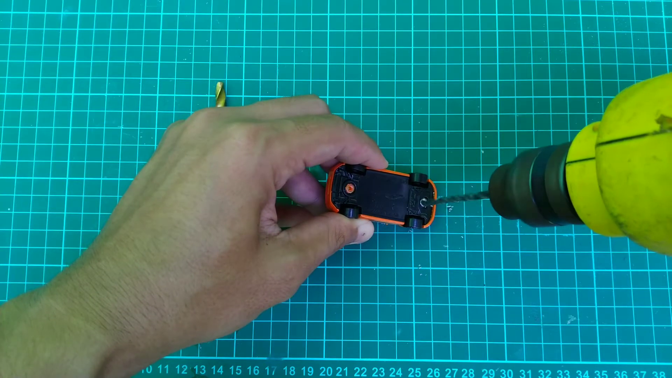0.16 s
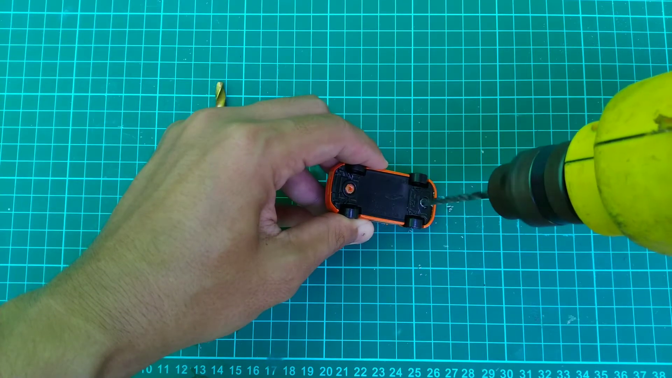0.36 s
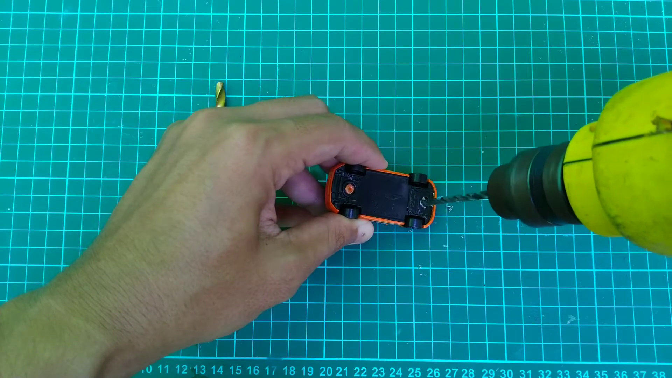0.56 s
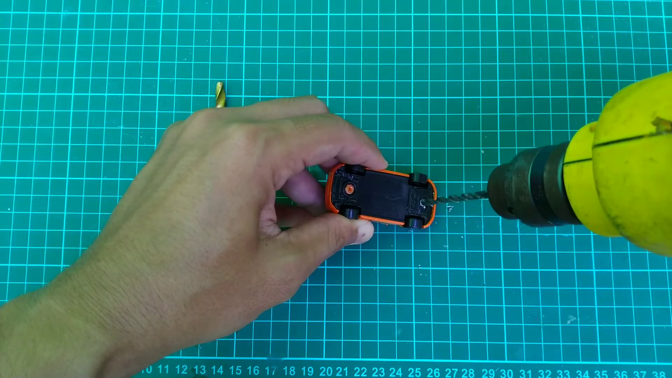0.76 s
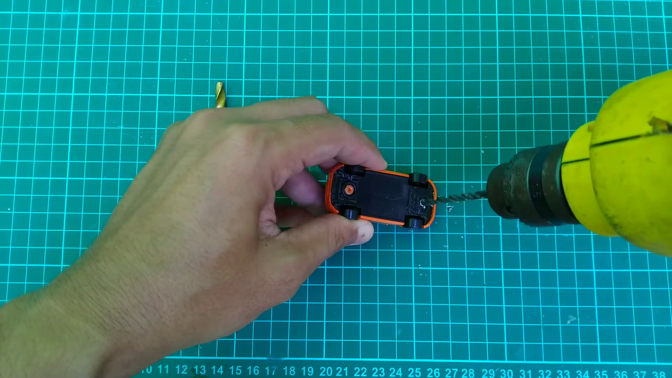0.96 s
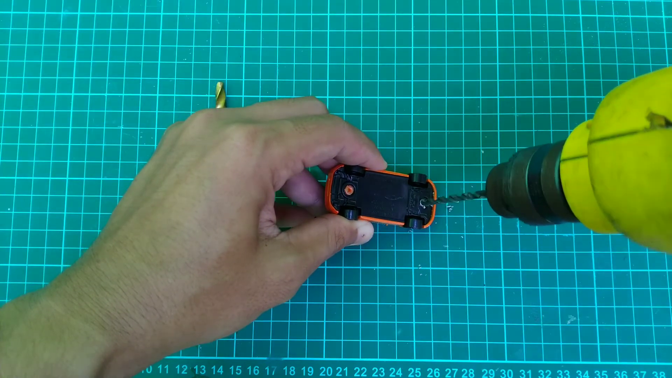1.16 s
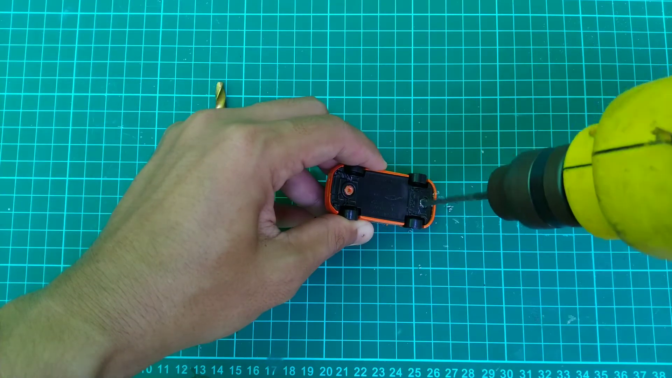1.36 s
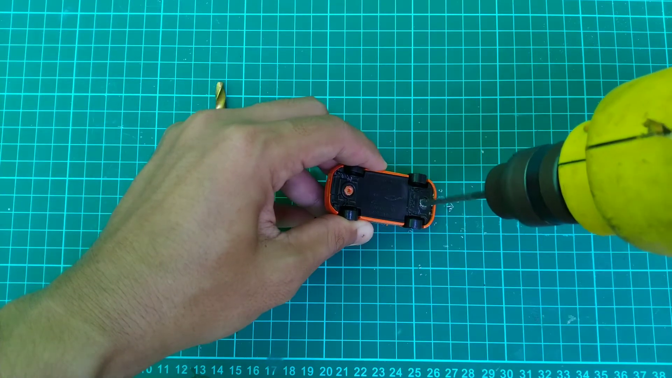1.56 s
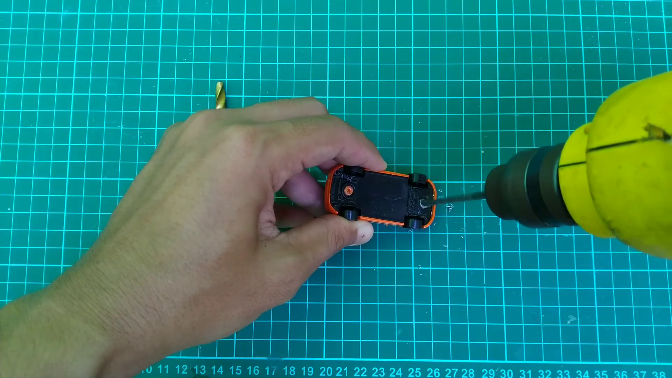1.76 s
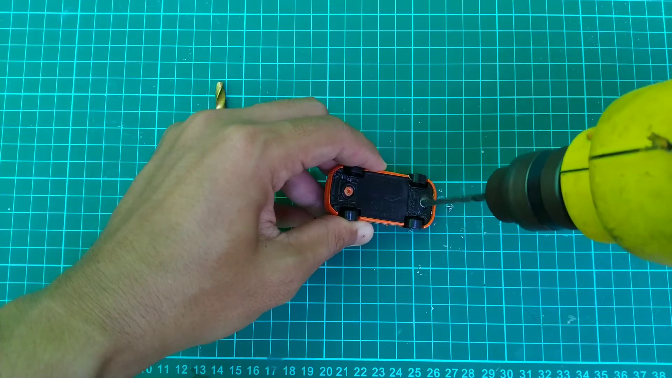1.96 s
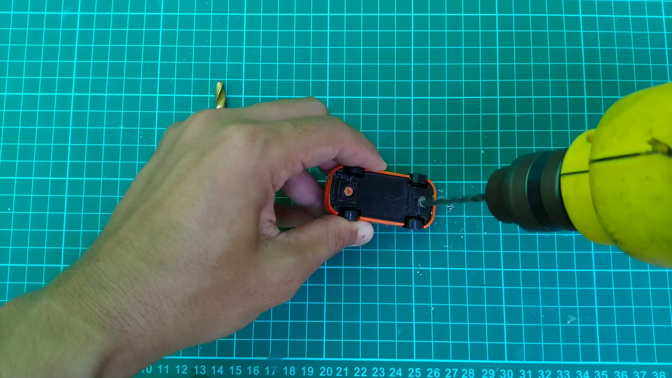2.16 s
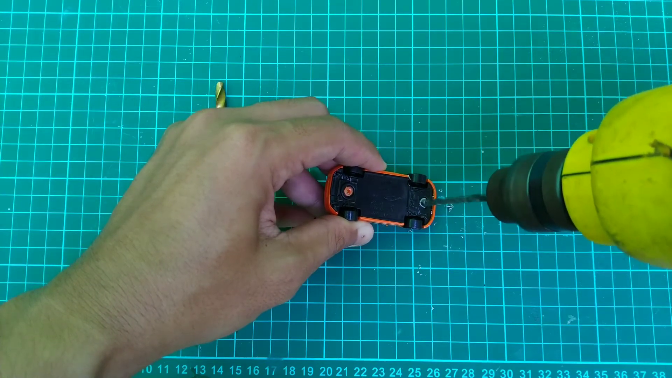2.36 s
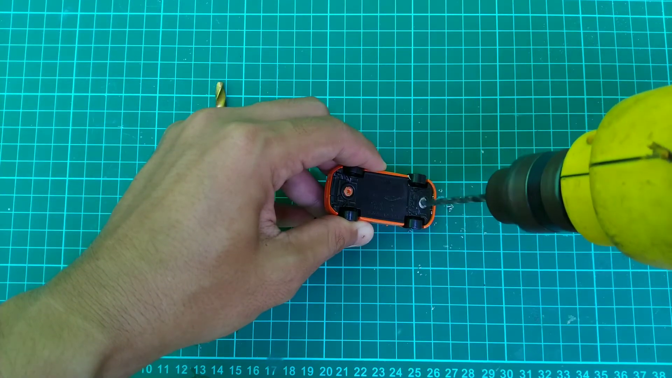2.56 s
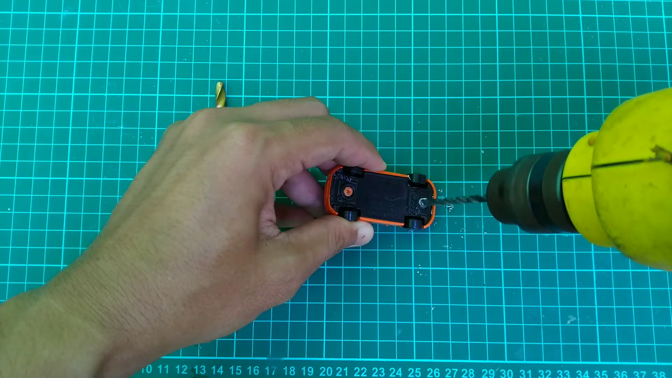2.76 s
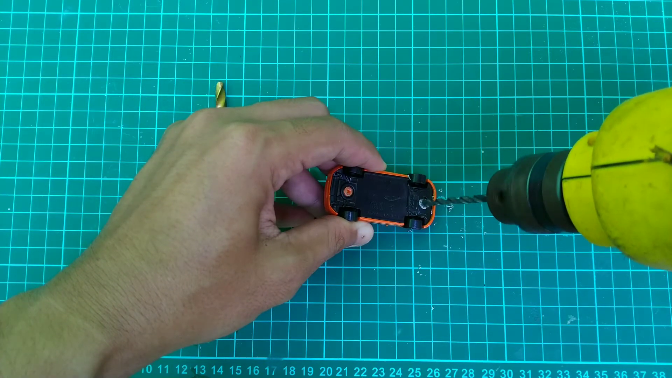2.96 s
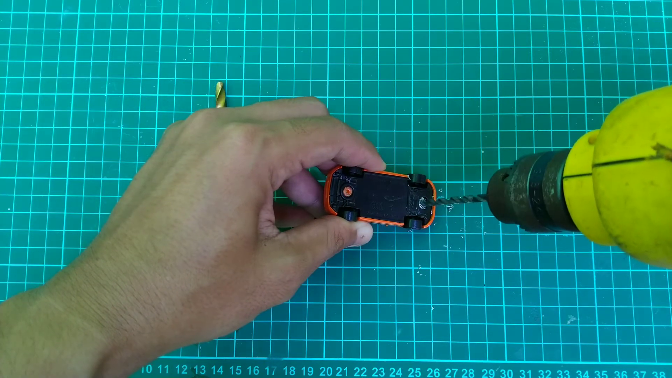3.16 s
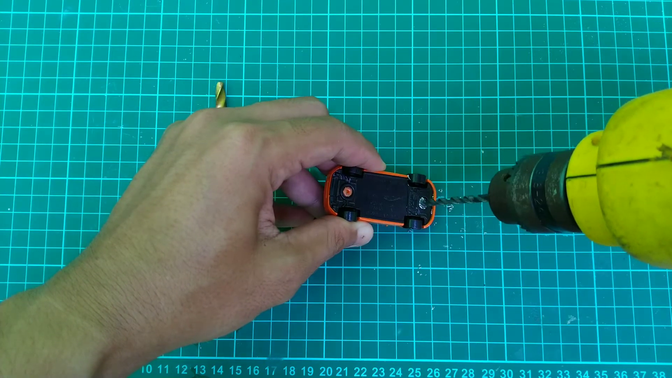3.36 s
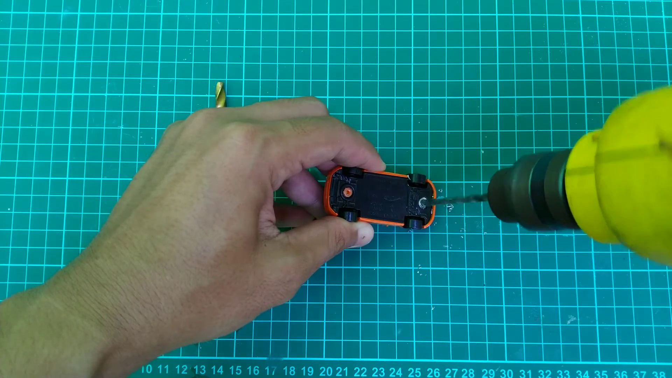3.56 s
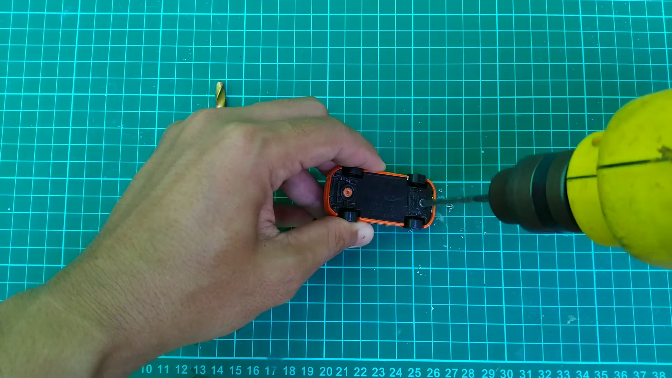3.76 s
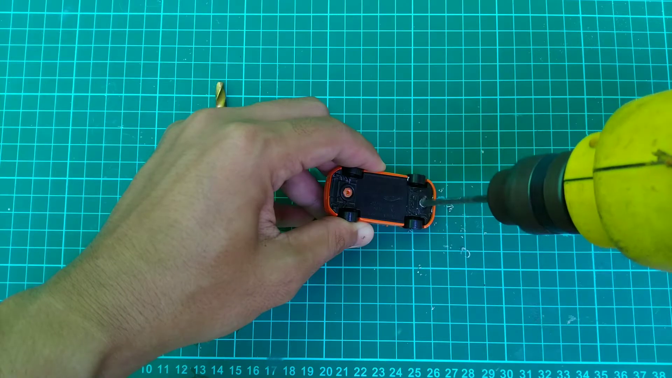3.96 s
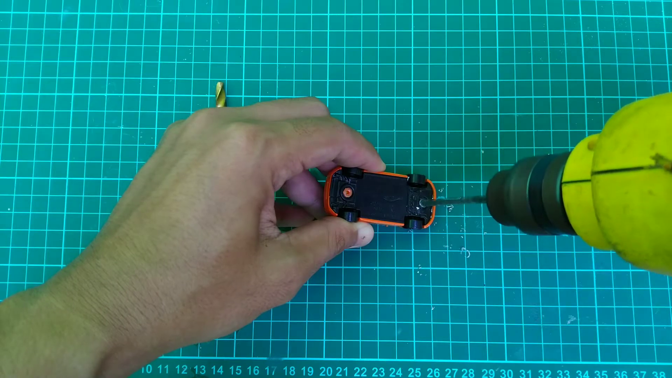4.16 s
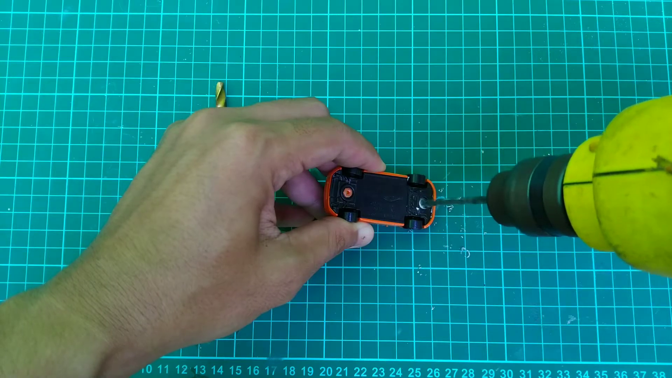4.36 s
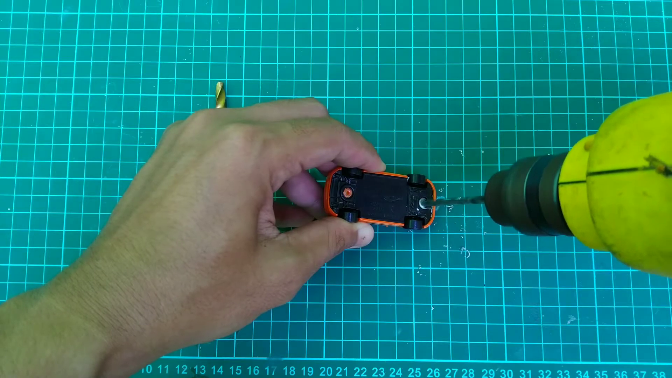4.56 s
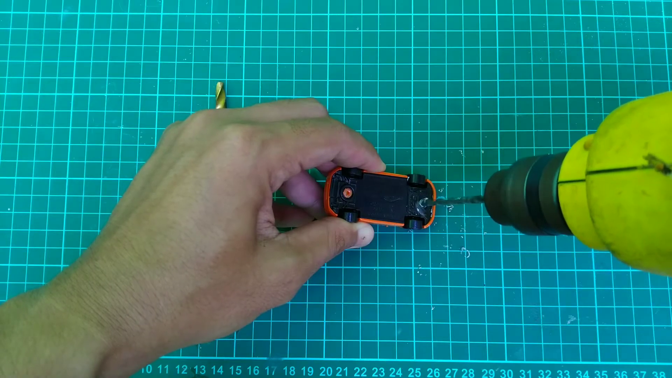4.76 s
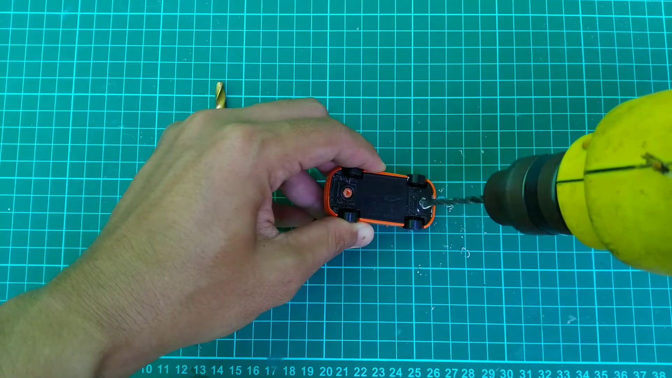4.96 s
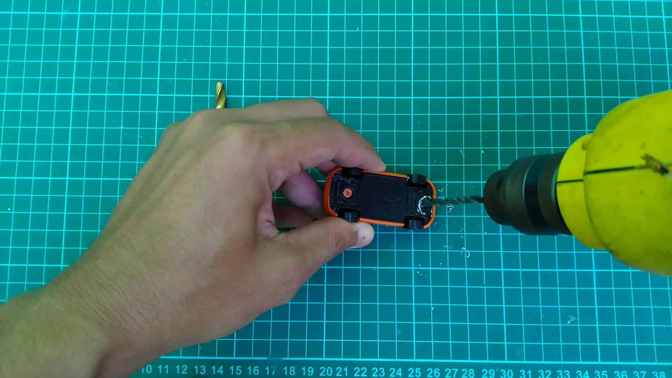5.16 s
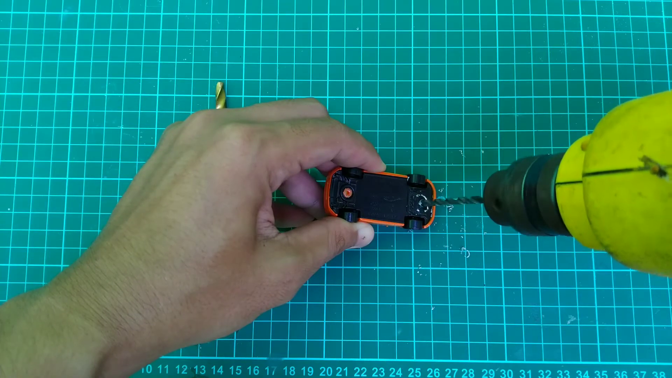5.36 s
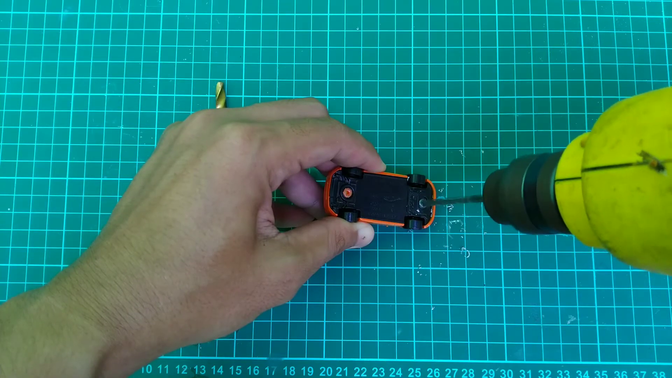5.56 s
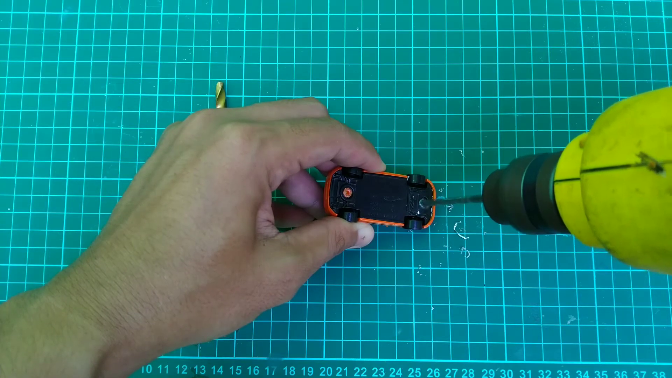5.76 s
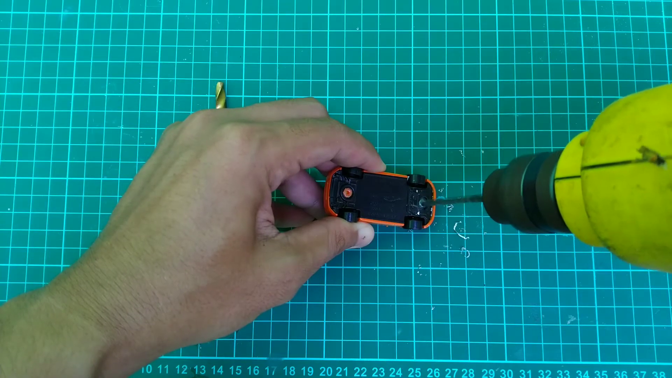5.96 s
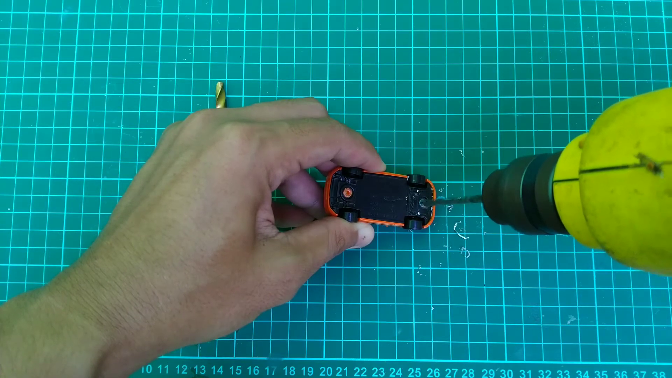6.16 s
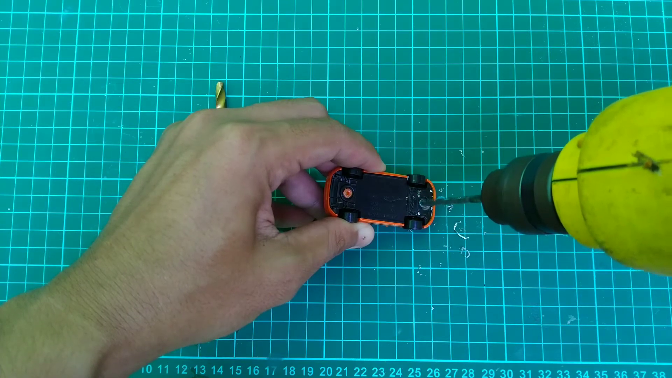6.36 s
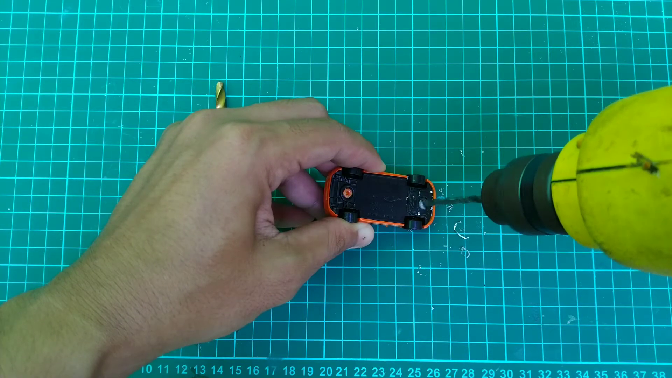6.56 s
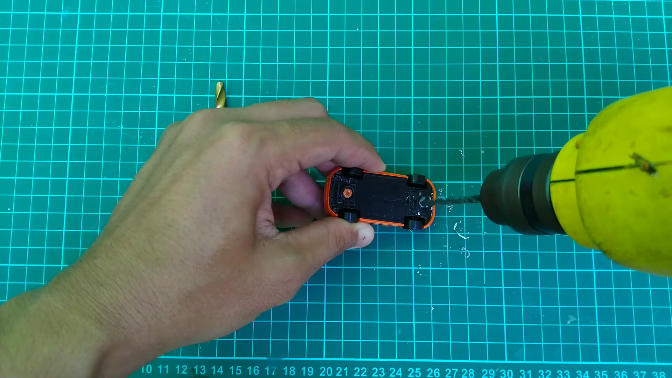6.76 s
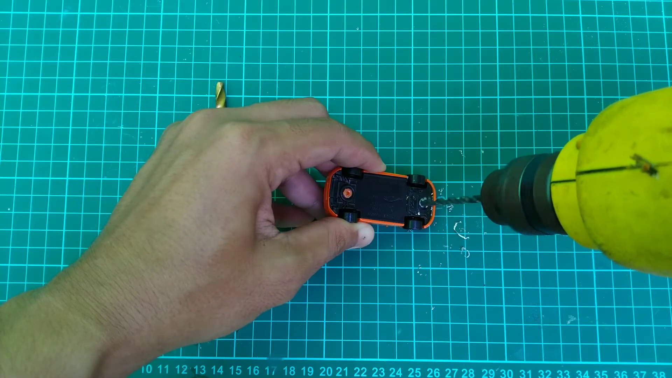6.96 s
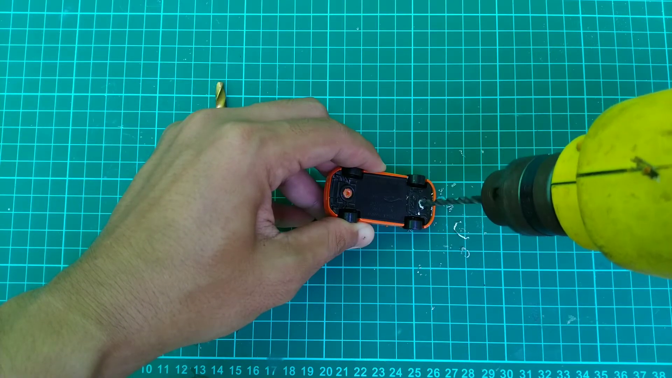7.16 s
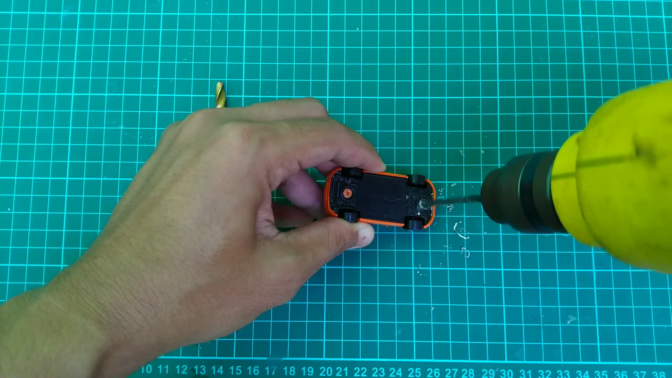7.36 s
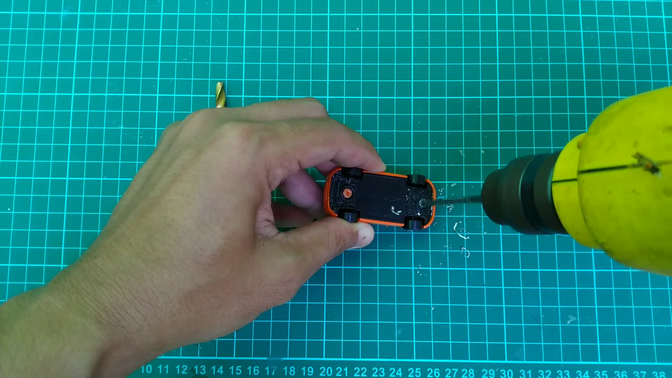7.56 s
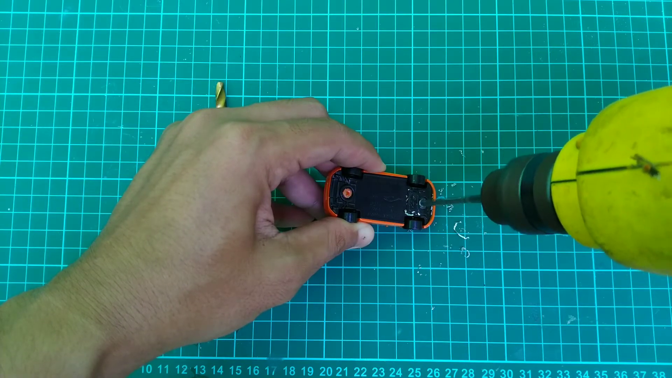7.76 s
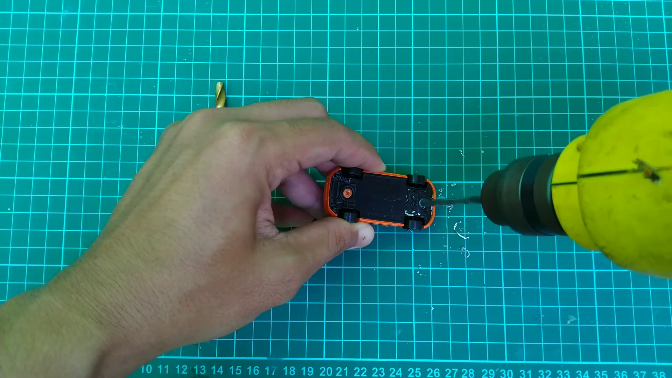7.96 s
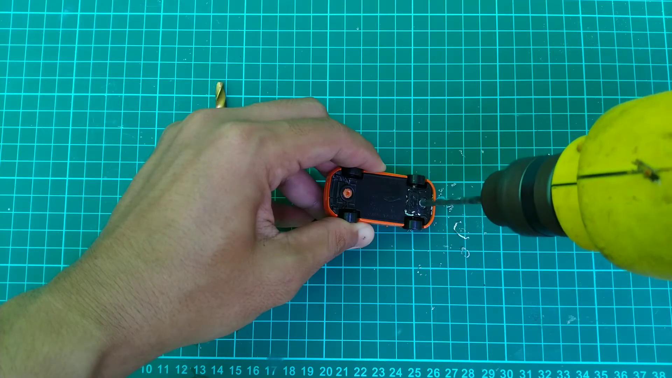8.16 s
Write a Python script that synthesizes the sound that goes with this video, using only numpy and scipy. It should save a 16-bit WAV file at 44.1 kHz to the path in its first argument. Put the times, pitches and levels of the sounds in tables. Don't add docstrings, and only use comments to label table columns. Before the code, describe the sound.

A mains hand drill, very close, is first heard slowing to rest. Small plastic trigger ticks follow, then four brief squeezes spaced about two seconds apart. Each kicks with a knock, leaps up to a buzzing whine in a fraction of a second, then coasts downward with rattling gears, scraping and airy fan hiss. Behind it sits quiet low room rumble and faint swelling hum, picked up in close stereo.

```python
import sys
import numpy as np
from scipy import signal
from scipy.fft import rfft, irfft, next_fast_len
from scipy.io import wavfile
from scipy.ndimage import uniform_filter1d, map_coordinates

SR = 44100
rng = np.random.default_rng(int(sys.argv[2]) if len(sys.argv) > 2 else 0)


def gain_from_db(level_db):
    decades = np.asarray(level_db, float) / 20
    return 10 ** decades


def dump(signal):
    limited = np.clip(np.atleast_2d(signal).T, -1, 1)
    pcm = np.round(limited * 32767).astype(np.int16)
    wavfile.write(sys.argv[1], SR, pcm)


N = 362061

# switch-on in seconds, release in seconds, tooth rate at release in Hz,
# braking in Hz/s, easing of the braking in Hz/s2.
SQUEEZES = [
    (-1.2, -1.06, 2342, 1287, 48),
    (1.252, 1.383, 2481, 1440, 30),
    (3.632, 3.788, 2648, 1624, 64),
    (5.548, 5.685, 2503, 1739, 129),
    (7.383, 7.528, 2540, 1678, 31),
]


def unit(x):
    return x / np.sqrt(np.mean(x ** 2) + 1e-20)


def along(points, hz):
    f, v = np.transpose(points)
    return np.interp(np.log(hz + 1), np.log(f + 1), v)


def wobble(rate):
    knots = rng.standard_normal(int(N * rate / SR) + 4)
    return map_coordinates(knots, [np.arange(N) * rate / SR])


def filtered(x, response):
    m = next_fast_len(N + 8192)
    return irfft(rfft(x, m) * response(np.fft.rfftfreq(m, 1 / SR)), m)[..., :N]


def housing(hz):
    # mode frequency in Hz, width in Hz, gain in dB.
    modes = [(540, 49, 8.5), (732, 234, 8.5), (1018, 403, 15), (1663, 217, 12), (2089, 240, 13.5),
             (2900, 197, 2.5), (3210, 370, 6), (4840, 450, 2)]
    return gain_from_db(sum(db / (1 + (2 * (hz - c) / w) ** 2) for c, w, db in modes))


def motor():
    teeth, spin_up_s = 12, 0.078
    t, tooth_hz, power = np.arange(N) / SR, np.zeros(N), np.zeros(N)
    for on, off, top_hz, brake, ease in SQUEEZES:
        coast = t - off
        spin_up = top_hz * np.expm1((on - t).clip(max=0) / spin_up_s) / np.expm1((on - off) / spin_up_s)
        coasting_hz = top_hz - brake * coast + ease * coast ** 2
        tooth_hz = np.where(t < on, tooth_hz, np.where(coast < 0, spin_up, coasting_hz))
        power += (t > on) & (coast < 0)
    tooth_hz = tooth_hz.clip(20) * (1 + 0.0012 * wobble(25))
    turns = np.cumsum(tooth_hz) / teeth / SR
    return turns, np.log2(2300 / tooth_hz), uniform_filter1d(power, size=200)


def levels(slow, power):
    # standstill in seconds, bite of the bit in dB, brightness in dB, last fade in seconds,
    # depth of the release dip as a factor.
    run_out = [
        (.86, -0.5, 0.5, 0.28, 1),
        (3.2, 0.18, 0.5, 0.36, 1.9),
        (5.54, 1.5, .5, 0.34, 1.5),
        (7.275, 1.5, 0.5, 0.28, 0.33),
        (9.1, 1.5, 1, .33, 0.94),
    ]
    # level at full speed in dB, halvings of speed before the fall, loss per halving in dB,
    # steepness of the stall as an exponent.
    coasting = [
        (-23.5, 0.24, 4, 1.63),
        (-20.5, 0.13, 8, 1.3),
        (-38, 1.5, -1, 1),
        (-25, 0.071, 10.5, 0.99),
    ]
    # extra level in dB while current flows, share of the speed loss while current flows, dip in dB as
    driven = [
        (1, 0.081, -2.5, 0.84),
        (0, 0.5, -2, 0.36),
        (-19.5, .1, 6, 0),
        (-0.5, 0.48, -2.5, 1.4),
    ]
    switch_s, slowest = 0.0052, 2.61
    unload_s, dip_s = 0.025, 0.037
    settle_s, settle_share = 0.14, 0.21

    t = np.arange(N) / SR
    burst = np.searchsorted([row[0] for row in SQUEEZES], t, side="right") - 1
    on, off = np.transpose(SQUEEZES)[:2, burst]
    stop, bite_db, bright_db, fade, slack = np.transpose(run_out)[:, burst]
    gate = -np.expm1((on - t) / switch_s)
    left = ((stop - t) / fade).clip(0, 1)
    quick = np.exp(-((t - off + unload_s) / dip_s) ** 2)
    settling = settle_share * np.exp(-((t - off) / settle_s) ** 2)
    dip = slack * (t > off - unload_s) * (quick + settling)
    gains = []
    for (db, knee, loss_db, steep), (extra_db, share, dip_db, tint) in zip(coasting, driven):
        halvings = np.logaddexp(0, 3 * (slow.clip(max=slowest) - knee)) / 3
        lost_db = loss_db * halvings * (1 - power * (1 - share))
        level_db = db + bite_db + tint * bright_db - lost_db + extra_db * power + dip_db * dip
        gains.append(gate ** 2 * left ** steep * gain_from_db(level_db))
    return gains


def noise(spectrum, spiky_db, shell):
    hits = rng.standard_normal((2, N)) * gain_from_db(spiky_db * wobble(1500))
    return unit(filtered(hits, lambda hz: gain_from_db(along(spectrum, hz)) * housing(hz) ** shell))


def gear_whine(turns, slow, power):
    # multiple of the shaft rate, level at full speed in dB, extra under power in dB,
    # loss per halving of speed in dB.
    orders = [(1, -29, -3, 6), (3, -31, -6, 5), (6, -21, -5, 0), (9, -22, -9, 3), (10, -24, -9, 3),
              (12, -9, 3, 4.5), (15, -21, -9, 5), (18, -12.5, -9, 5), (22, -16, -9, 6), (24, -7, -7, 8),
              (28, -16, -8, 7), (30, -17, -8, 7), (31, -19, -8, 6), (36, -19, -8, 9), (48, -15, -8, 18),
              (72, -15, -8, 18)]
    tones = np.zeros((2, N))
    for order, db, power_db, fade_db in orders:
        phase = rng.uniform(0, 2 * np.pi) + 0.3 * wobble(30) + 1.1 * power * wobble(200)
        level_db = db + power_db * power - fade_db * slow * (1 - power)
        level_db = level_db + 1.2 * wobble(10) + 2.2 * wobble(40)
        tones += np.array([[1.2], [0.4]]) * gain_from_db(level_db) * np.sin(2 * np.pi * order * turns + phase)
    return tones


def drill():
    # frequency in Hz, density in dB per Hz.
    rattle_spectrum = [(900, -25.5), (1350, -5), (1600, -6), (2500, 1.5), (3000, -0.5), (4000, -21)]
    scrape_spectrum = [(2000, -26), (2900, -7), (4000, -0.5), (5300, 1), (6500, -3), (7100, -10),
                       (7800, -18.5), (9000, -43)]
    drone_spectrum = [(100, -50.5), (200, -1), (350, -0.5), (600, 3), (1000, -7.5), (1300, -10),
                      (2000, -19.5)]
    hiss_spectrum = [(6500, -30), (7900, -14), (8700, -4.5), (9800, -2.5), (12500, 2), (14000, -1),
                     (15000, -4), (15700, -22), (16200, -35)]
    # frequency in Hz, gain in dB.
    whine_response = [(60, -6), (200, 0), (330, -5), (540, 3), (720, -5), (950, -4), (1300, -8),
                      (1650, 1.5), (2500, 3), (3300, 4), (4300, 5), (5200, -2), (7800, -9), (13000, -2)]
    mains_hz = 50

    turns, slow, power = motor()
    rattle_gain, scrape_gain, drone_gain, hiss_gain = levels(slow, power)
    throb = gain_from_db(power * np.cos(2 * np.pi * 2 * mains_hz * np.arange(N) / SR))
    chatter = gain_from_db(0.91 * wobble(12) + 0.55 * wobble(90) + 0.31 * np.cos(2 * np.pi * turns))
    chatter = chatter * gain_from_db(0.72 * (1 - power) * slow.clip(0.5, 4) * wobble(260))

    rattle = rattle_gain * unit(chatter * throb ** 0.88 * noise(rattle_spectrum, spiky_db=1.5, shell=0.87))
    scrape = scrape_gain * unit(chatter * throb ** 0.9 * noise(scrape_spectrum, spiky_db=1.5, shell=0.92))
    drone_gain = drone_gain + gain_from_db(-9.5) * power * rattle_gain
    drone = drone_gain * unit(chatter * noise(drone_spectrum, spiky_db=3, shell=1.0))
    hiss = hiss_gain * unit(chatter ** 0.23 * throb ** 0.89 * noise(hiss_spectrum, spiky_db=1.0, shell=0))

    load = uniform_filter1d(rattle_gain, size=400)
    whine = load * throb ** 5 * gear_whine(turns, slow, power)
    whine = filtered(whine, lambda hz: gain_from_db(along(whine_response, hz)) * housing(hz) ** 0.6)
    return gain_from_db(-0.16) * rattle + gain_from_db(-0.53) * scrape + gain_from_db(-3.5) * drone + gain_from_db(0.9) * hiss + whine


def room():
    # frequency in Hz, density in dB per Hz.
    rumble_spectrum = [(30, -40), (50, 2.5), (100, 0), (200, -1), (300, -3.5), (450, -9), (700, -16),
                       (1000, -41)]
    air_spectrum = [(290, -28), (500, -4.5), (1030, -6), (1380, -6.5), (6700, -19), (7980, -31),
                    (8960, -24), (14900, -13.5), (16000, -13)]
    # time in seconds, rumble level in dB.
    rumble_course = [(0, -48), (.5, -48.5), (1.2, -49), (1.8, -51.5), (2.9, -48.5), (3.25, -50),
                     (3.55, -57), (4.5, -55), (5.4, -50), (6.1, -50.5), (6.9, -52), (7.4, -48),
                     (8.21, -51.5)]
    # time in seconds, peak in dB, half length in seconds.
    hum_swells = [(.35, -52, 0.089), (0.653, -52, .07), (0.947, -50, .15), (1.32, -50, .06),
                  (1.76, -47, .12), (3.2, -45, 0.13), (3.766, -51, 0.062), (4.2, -47, 0.13),
                  (4.804, -55, 0.2), (5.594, -45, 0.18), (5.98, -41, 0.078), (6.397, -51, 0.065),
                  (6.756, -49, 0.091), (7.19, -40.5, .12), (7.5, -45, .12), (7.892, -45, 0.083)]
    jolt_db, jolt_s = -43, 0.044
    hum_floor_db, air_db = -60, -63 + 4.5

    t = np.arange(N) / SR
    jolts = sum(gain_from_db(jolt_db) * np.exp(-((t - on - jolt_s) / jolt_s) ** 2) for on, *_ in SQUEEZES)
    swells = gain_from_db(hum_floor_db) + sum(gain_from_db(db) * np.exp(-((t - s) / half) ** 2) for s, db, half in hum_swells)

    def shared(hz):
        likeness = along([(60, 0.8), (200, 0.93), (450, 0.48), (900, 0.1)], hz)
        turn = np.arccos(likeness.clip(0, 1)) / 2
        return gain_from_db(along(rumble_spectrum, hz)) * np.array([np.cos(turn), np.sin(turn)])

    mid, side = filtered(rng.standard_normal((2, N)), shared)
    rumble_gain = gain_from_db(np.interp(t, *np.transpose(rumble_course))) + jolts
    rumble = gain_from_db(2.5) * rumble_gain * unit(np.array([mid + side, mid - side]))
    hum = swells * np.sin(2 * np.pi * 161 * t + 1.75 * wobble(6))
    air = unit(filtered(rng.standard_normal((2, N)), lambda hz: gain_from_db(along(air_spectrum, hz))))
    return rumble + hum + gain_from_db(air_db) * air


def trigger():
    # time in seconds, peak in dB, low knock in dB, sizzle in dB.
    ticks = [(0.8044, -43.5, 2.5, -6.5), (0.8235, -30.5, -4, -17), (0.9583, -32, 0, -8),
             (1.083, -32, 1, -21.5), (1.1094, -33.5, -6, -16), (1.2217, -34, -3.5, -8),
             (3.0894, -50, -8.5, -20), (3.4795, -34, -8.5, -11), (3.5174, -36, 0.5, -22),
             (3.5456, -41, 4, -3.5), (3.5723, -43.5, 4, -22), (3.595, -46.5, 1, -3), (5.3884, -40, -10, -9),
             (5.452, -34.5, 6, -12), (5.5014, -36.5, -9.5, -15), (5.5154, -42, 1, -1),
             (7.2064, -50, 7, -8.5), (7.2254, -46, 9, -9), (7.2504, -31.5, 5.5, -7), (7.3108, -46, 5, -7),
             (7.3317, -36.5, 4, -4), (7.3547, -47.5, 13, 5.5)]
    take_up = [
        (1.232, -34.5, 9.5, -2),
        (3.619, -36.5, -3, -1),
        (7.375, -40.5, 1, 1),
    ]
    kicks = [
        (1.262, -16.5, 8, -8),
        (3.646, -21.5, 10.5, 3),
        (5.553, -23.5, 3, -5),
        (5.565, -24, 9, -10),
        (7.388, -23.5, 6, 3),
        (7.398, -25.5, 10, -6),
    ]
    # frequency in Hz, level in dB.
    snap_spectrum = [(800, -14), (1300, 5.5), (2200, -4), (3300, -4), (4500, -17.5)]
    sizzle_spectrum = [(2800, -25), (3800, -1), (6000, -7.5), (7800, -38), (12000, 2.5), (16000, -13.5)]

    t, x = np.arange(SR // 20) / SR, np.zeros((3, 2, N + SR))
    envelope = gain_from_db(-60 * t / 0.023) * (1 - np.exp(-t / 0.00033))
    for s, db, knock_db, sizzle_db in [*ticks, *take_up, *kicks]:
        scrape = rng.standard_normal((3, 2, len(t))) * envelope
        gains = gain_from_db(db + np.array([knock_db, 0, sizzle_db]))
        x[..., round(s * SR):][..., :len(t)] += scrape * gains[:, None, None]
    knock = filtered(x[0, :, :N], lambda hz: gain_from_db(11.5) / (1 + ((hz - 720) / 170) ** 2))
    snap = filtered(x[1, :, :N], lambda hz: gain_from_db(along(snap_spectrum, hz) + 6) * housing(hz) ** 0.21)
    sizzle = filtered(x[2, :, :N], lambda hz: gain_from_db(along(sizzle_spectrum, hz) + 6))
    return knock + snap + sizzle


def ports(pair):
    # frequency in Hz, left over right in dB.
    lean = [(100, 6.5), (470, 5.5), (800, 1.5), (1350, 2), (1640, 5.5), (2100, -3), (2400, 1), (2800, 0),
            (3800, -7.5), (5200, 6.5), (7500, -0.5), (10000, -0.5), (15000, 5)]
    # frequency in Hz, likeness of the ports from 0 to 1.
    alike = [(300, 0.43), (500, 0.97), (1200, 0.62), (1600, 0.61), (2000, 0.09), (2700, 0.081),
             (4500, 0.17), (7000, 0.12), (15000, 0.064)]
    # frequency in Hz, lag of the right port in ms.
    lag = [(300, .12), (600, .18), (1000, .34), (1400, .39), (2000, .42), (2400, .46), (2650, .55),
           (2900, .31), (3500, .31), (4100, .385), (5000, .417), (6000, .44), (7000, .36), (16000, .42)]

    def blend(hz):
        turn = np.arccos(np.clip(along(alike, hz), 0, 1)) / 2
        return np.array([np.cos(turn), np.sin(turn)])

    def tilt(hz):
        half = gain_from_db(along(lean, hz) / 2) * np.exp(1j * np.pi * hz * along(lag, hz) / 1000)
        return np.array([half, 1 / half])

    mid, side = filtered(pair, blend)
    return filtered(np.array([mid + side, mid - side]), tilt)


def scene():
    return gain_from_db(2.5) * ports(drill() + trigger()) + room()


def low_pass(x):
    return signal.sosfilt(signal.butter(12, 15750, fs=SR, output="sos"), x)


def record(dry):
    ceiling = 0.9
    return low_pass(dry.clip(-ceiling, ceiling))


dry = scene()
out = record(dry)
dump(out)
```